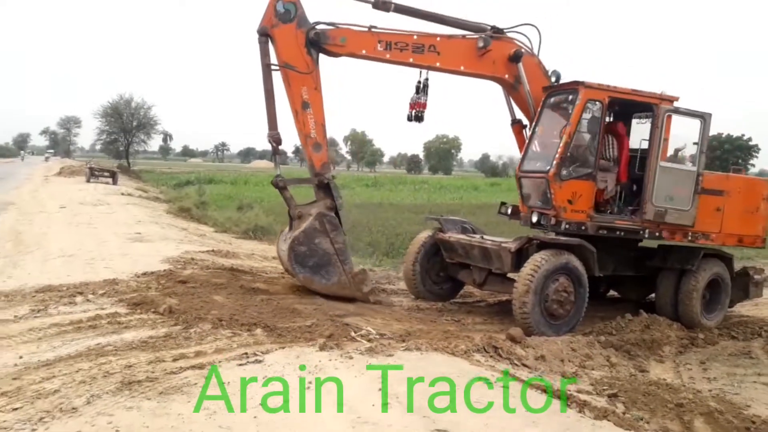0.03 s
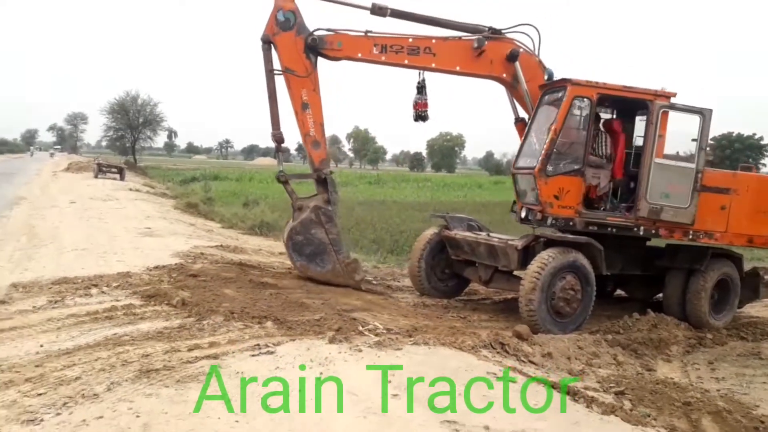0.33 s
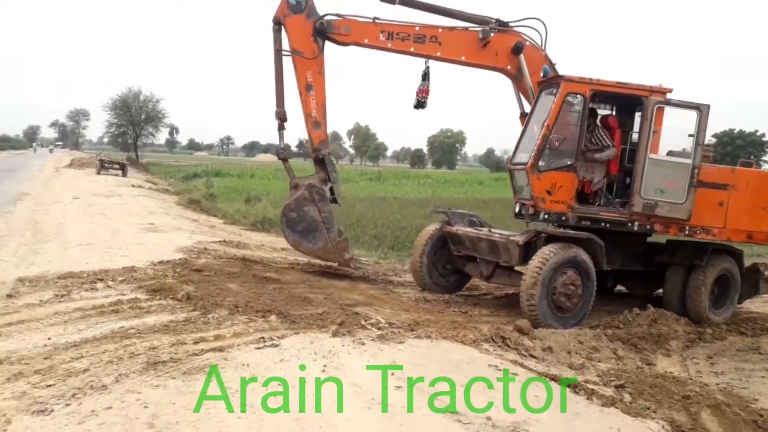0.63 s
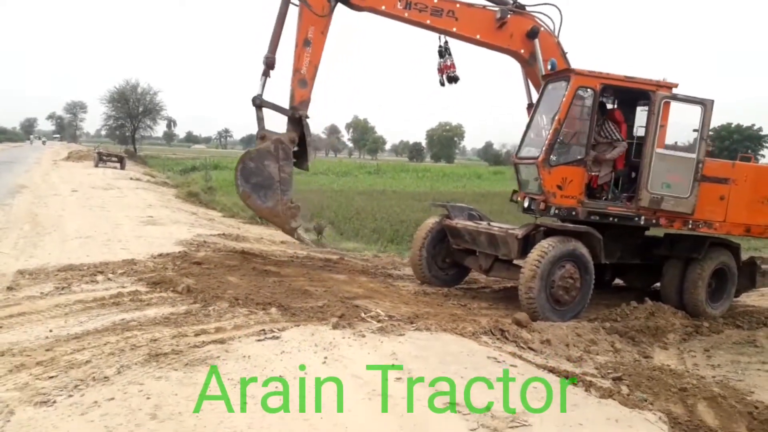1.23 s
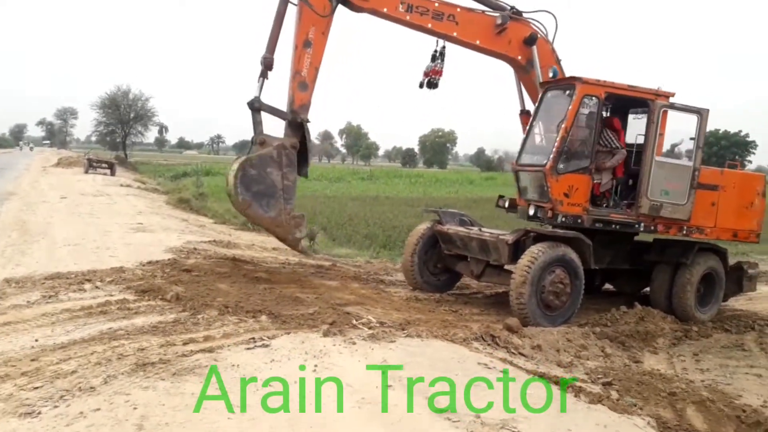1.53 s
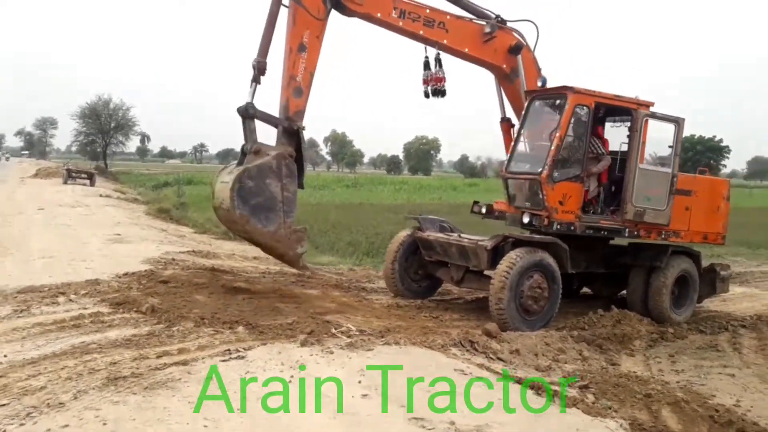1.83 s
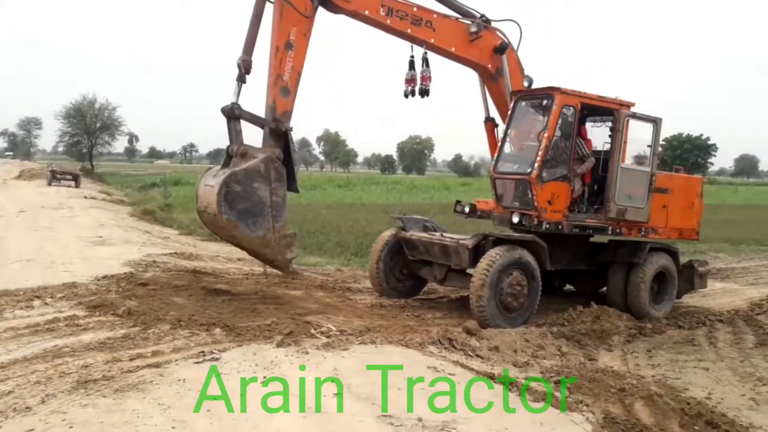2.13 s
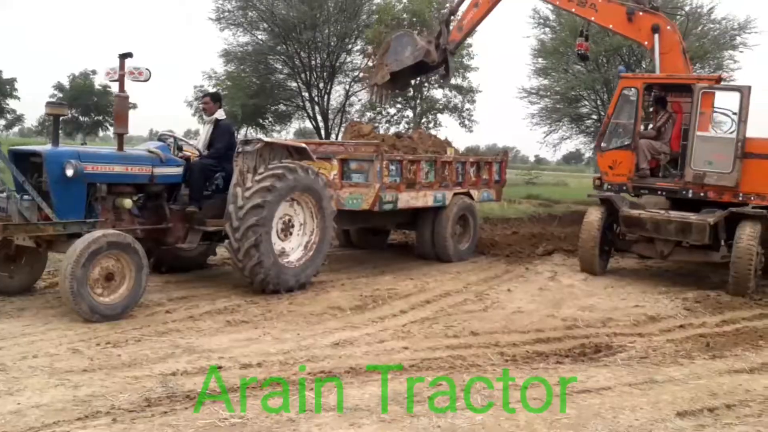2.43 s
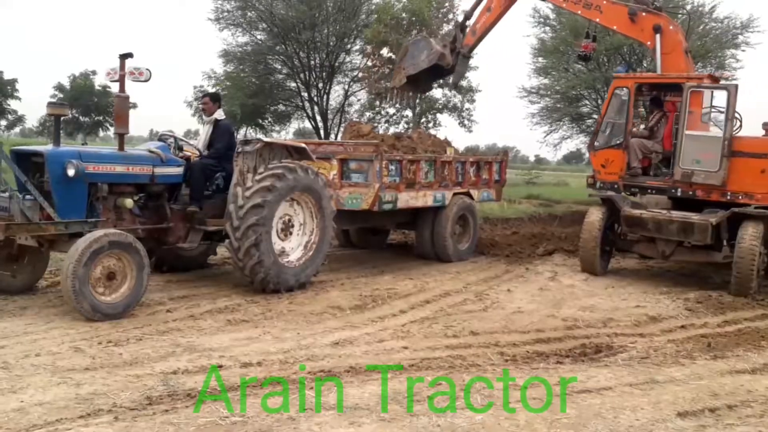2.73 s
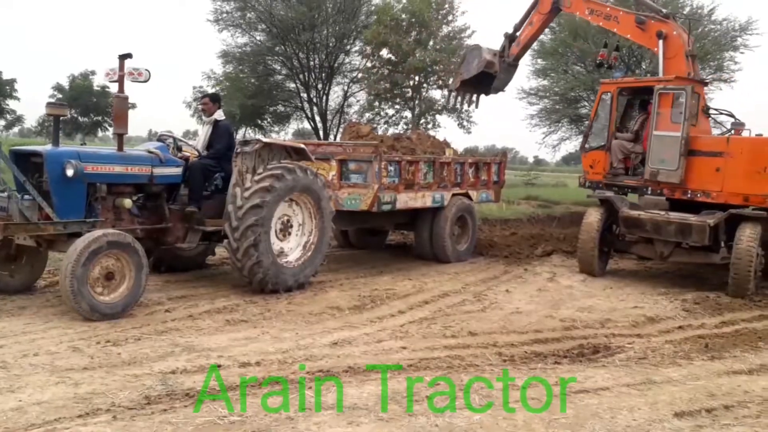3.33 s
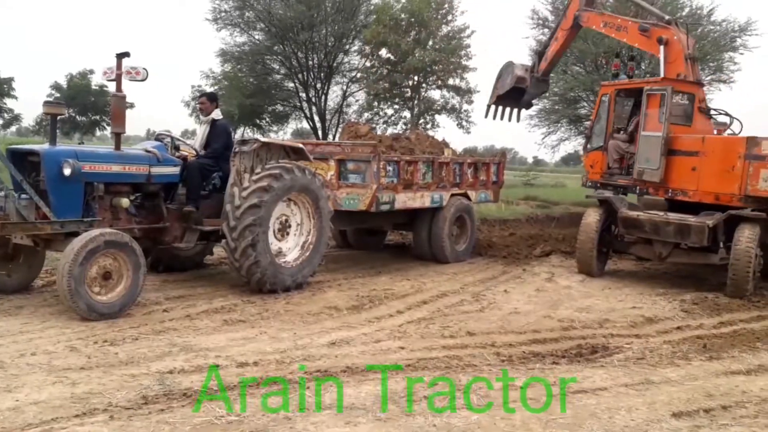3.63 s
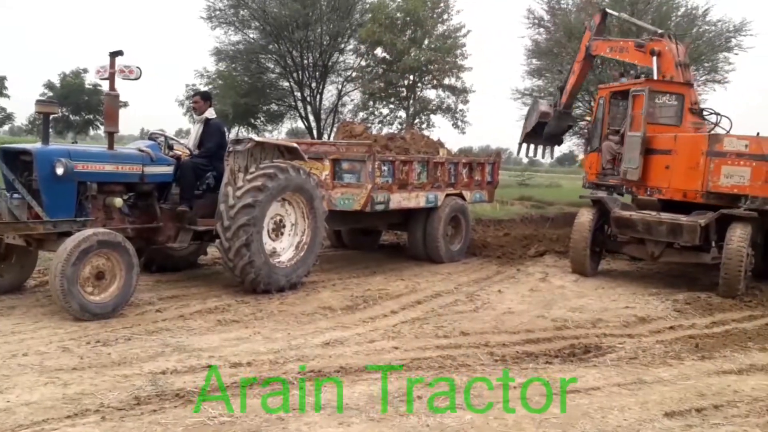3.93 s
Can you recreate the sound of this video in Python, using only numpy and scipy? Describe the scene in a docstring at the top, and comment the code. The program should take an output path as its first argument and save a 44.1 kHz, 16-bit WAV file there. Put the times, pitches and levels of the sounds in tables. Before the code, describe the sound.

A diesel excavator runs and clanks its bucket, then works farther off after a brief silence.

```python
"""On open ground, a wheeled diesel excavator scrapes up soil. Its steel bucket clanks and groans,
stones tick on it, and the engine slows under load and recovers while the hydraulics rasp and hiss.
After a short silence the machine works farther off, beside a tractor and trailer: one hears an engine
clatter, a pump hum and whine, and the arm clink. A small bird whistles now and then."""
import sys
import numpy as np
from scipy import signal
from scipy.fft import rfft, irfft
from scipy.io import wavfile
from scipy.ndimage import map_coordinates

SR = 44100
rng = np.random.default_rng(int(sys.argv[2]) if len(sys.argv) > 2 else 0)


def wrap_up_sound(samples):
    """Save the sound to the file named by the first command line argument, as 16-bit audio."""
    columns = np.atleast_2d(samples).T
    # keep every value between -1 and 1, then stretch to whole-number steps
    tamed = np.clip(columns, -1, 1)
    steps = np.round(tamed * 32767).astype(np.int16)
    wavfile.write(sys.argv[1], SR, steps)


N = 176400

SILENCE_START_S, SILENCE_END_S = 2.243, 2.578
CYLINDERS, TOP_HZ = 4, 15600
ATTACK_S = 0.00064  # how fast a hit builds up

# bird whistles (time [s], length [s], first pitch [Hz], last pitch [Hz], level [dB])
WHISTLES = [(0.16, 0.067, 6200, 5210, -39), (1.499, 0.092, 6830, 5550, -42),
            (1.546, 0.047, 5850, 3090, -41), (1.861, 0.12, 7670, 5590, -43), (2.16, 0.067, 5960, 4800, -39)]
# tiny bird chirps (time [s], level [dB])
CHIRPS = [(2.847, -34), (3.762, -33), (3.773, -30)]

# how fast the far engine fires (time [s], firing rate [Hz])
FAR_SPEED = [(2.7, 68.75), (3.12, 69.12), (3.42, 62.93), (4, 65.27)]
# how loud the far engine is (time [s], level [dB])
FAR_LEVEL = [(2.58, -45.5), (2.71, -27), (2.87, -24), (3.15, -23.5), (3.45, -25)]
# low and high parts of its clatter (frequency [Hz], relative level [dB])
FAR_BODY = [(53, -39), (90, -13), (123, -14), (161, -7), (329, -6.5), (480, -21.5), (655, -4), (838, -7.5),
            (1270, -21.5), (1520, -10), (2000, -29), (3600, -95)]
FAR_TREBLE = [(1700, -22), (2140, -1.5), (2630, -5.5), (3120, -1.5), (5260, -17), (6830, -18),
              (7960, -34.5), (15500, -30.5)]
# the oil pump (time [s], hum level [dB], whine level [dB])
PUMP_LEVELS = [(2.6, -56, -54.5), (2.85, -31, -32.5), (3.08, -51, -34), (3.22, -35, -43.5),
               (3.35, -30, -46), (3.83, -27, -38), (4, -37, -44)]
# tones in its whine (multiple of the pump's rate, relative level [dB])
WHINE_TONES = [(2, -2.5), (12, -4.5), (18, -10.5)]
# clinks of the far arm (time [s], level [dB], pitch [Hz])
CLINKS = [(2.925, -35, 3400), (3.353, -32.5, 4330), (3.725, -29.5, 3840), (3.787, -36.5, 4400),
          (3.807, -22.5, 1476)]

# how fast the near engine fires (time [s], firing rate [Hz])
NEAR_SPEED = [(.2, 120), (.75, 113.2), (1.28, 113.4), (1.5, 80.67), (1.8, 48.63), (1.98, 56.4), (2.1, 80.3),
              (2.24, 103.5)]
# its exhaust tones (multiple of the firing rate, level at top speed [dB])
EXHAUST_TONES = [(1, -38.5), (2, -39.5), (2.5, -38), (3.5, -40.5)]
# low and high parts of its clatter (frequency [Hz], relative level [dB])
NEAR_BODY = [(82, -40), (140, -19), (214, -11.5), (264, -3.5), (336, -11.5), (470, -5), (845, -24),
             (948, -19), (1310, -10.5), (2200, -27.5), (3600, -91.5)]
NEAR_TREBLE = [(1060, -38), (2160, -10), (2700, 3), (3320, -10.5), (3600, -4.5), (4720, -8.5), (5350, -5.5),
               (6300, -16.5), (11100, -18), (15500, -41.5)]
# whining rasp of the hydraulics (time [s], pitch [Hz], level [dB])
RASP = [(.1, 3400, -47), (.3, 3353, -35.5), (1.27, 3247, -41.5), (1.42, 2780, -30), (1.75, 2826, -70)]

# further hits on the bucket, heard only as dull thuds (time [s], level [dB])
KNOCKS = [(1.096, -22.5), (1.833, -24.5)]
# the bucket dragging through stony soil (time [s], level [dB])
SCRAPE_LEVEL = [(1.9, -52), (1.96, -28.5), (2.24, -37.5)]
# stones hitting steel (time [s], level [dB], pitch [Hz])
STONES = [(0.4187, -20, 9400), (0.4688, -23, 7800), (0.7555, -25.5, 9200), (0.773, -35, 10800),
          (1.9993, -28.5, 7000), (2.0278, -26, 6550)]
# steel rubbing (time [s], length [s], pitch [Hz], level [dB])
RUBS = [(0.762, .46, 263.8, -23), (3.73, .2, 3980, -41)]
# hits on the bucket (time [s], crash [dB], ring [dB], thud [dB], click [dB], pitch of the spot hit [Hz])
BUCKET_HITS = [(0.384, -19.5, -20.5, -22.5, -23.5, 3600), (0.569, -19.5, -34, -13.5, -30, 2600),
               (0.635, -22.5, -19, -31, -25, 3220), (0.692, -19.5, -10, -20, -32, 3400),
               (0.7206, -26, -15, -14.5, -27, 4100), (0.7424, -19, -10.5, -15, -38, 2400),
               (1.9404, -20, -11.5, -10, -23, 4760), (2.056, -20, -23.5, -28, -31.5, 1500),
               (2.128, -18.5, -22, -14, -30, 2590), (2.208, -25.5, -19.5, -21, -41, 1484)]
# the bucket's low ringing notes (pitch [Hz], level relative to the ring [dB], time to fade 60 dB [s])
BUCKET_NOTES = [(245.8, 2.5, 0.3), (397.5, -12, 0.7), (472.7, -8.5, 0.28), (642.5, -4, .12),
                (932, -17.5, 0.41)]
# high ringing notes of its plates (pitch [Hz])
PLATES_HZ = [1404, 2585, 2670, 3390, 3680, 4400, 5140, 9160, 10950]
# the low, middle and high noise of a hit (frequency [Hz], relative level [dB])
THUD = [(120, -32), (235, 4.5), (380, -5.5), (640, 8), (950, -17.5), (4000, -54.5)]
CRASH = [(400, -50), (950, -4.5), (1450, 4.5), (2000, -6), (2700, 0.5), (5200, -20), (14000, -47.5)]
CLICK = [(1200, -33.5), (4000, 7), (10500, -8), (16000, -26.5)]


def amp(db):
    """Turn decibels into a number to multiply by."""
    return 10 ** (np.asarray(db) / 20)


def unit(x):
    """Scale a sound to an average strength (rms) of 1."""
    return x / np.sqrt(np.mean(x ** 2) + 1e-20)


def clock():
    """The time of each sample, in seconds."""
    return np.arange(N) / SR


def curves(rows):
    """Join a table's points with straight lines: one curve for each column after the time."""
    times, *columns = np.transpose(rows)
    return [np.interp(clock(), times, column) for column in columns]


def wobble(rate):
    """A smooth curve through `rate` random points a second."""
    return map_coordinates(rng.standard_normal(int(N * rate / SR) + 4), [clock() * rate])


def coloured(x, colour):
    """Shape a sound's lows and highs by a (frequency, level) table, at strength 1."""
    points_hz, db = np.transpose(colour)
    hz = np.fft.rfftfreq(N, 1 / SR)
    gain = amp(np.interp(np.log(hz + 1), np.log(points_hz + 1), db))
    return unit(irfft(rfft(x) * gain, N))


def noise(colour):
    """Noise with shaped lows and highs."""
    return coloured(rng.standard_normal(N), colour)


def band(hz, q):
    """Noise around one pitch; a higher q sounds more like a note."""
    return unit(signal.lfilter(*signal.iirpeak(hz, q, fs=SR), rng.standard_normal(N)))


def strike(start, fade_s):
    """The loudness of a hit: a quick rise, then a fall of 60 dB in fade_s."""
    age = np.maximum(clock() - start, 0)
    return (1 - np.exp(-age / ATTACK_S)) * np.exp(-np.log(1000) * age / fade_s)


def tone(cycles, multiple, rough):
    """A tone that follows a running count of cycles; `rough` makes it waver."""
    level = np.sqrt(2) * (1 + rough * wobble(21.84))
    return level * np.sin(2 * np.pi * multiple * cycles + rough * wobble(35))


def count_firings(speed):
    """How many times a slightly unsteady engine has fired so far."""
    return np.cumsum(speed * (1 + .002 * wobble(30))) / SR


def clatter(firings, colour, repeat):
    """Firings shake the engine's metal; part of the shaking repeats every engine cycle."""
    flutter = amp(1.4 * wobble(400))
    pattern = rng.standard_normal(2048)
    repeating = pattern[(firings / CYLINDERS % 1 * len(pattern)).astype(int)]
    return coloured(flutter * (rng.standard_normal(N) + repeat * repeating), colour)


def bird(slide_s=0.034, chirp_hz=6950):
    """A small bird gives tiny chirps and whistles that slide down to a held note."""
    out = np.zeros(N)
    for start, length, first_hz, last_hz, db in WHISTLES:
        age = np.arange(int(length * SR)) / SR
        hz = np.interp(age, [0, slide_s], [first_hz, last_hz])
        phase = 2 * np.pi * np.cumsum(hz) / SR + .5 * wobble(680)[:len(age)]
        swell = signal.windows.tukey(len(age), .5)
        out[int(start * SR):][:len(age)] += np.sqrt(2) * amp(db) * swell * np.sin(phase)
    age = np.arange(int(0.0035 * SR)) / SR
    chirp = np.hanning(len(age)) * np.sin(2 * np.pi * chirp_hz * age)
    for start, db in CHIRPS:
        out[int(start * SR):][:len(age)] += amp(db) * chirp
    return out


def pump(firings):
    """The oil pump hums and whines, its pitch following the engine's speed."""
    hum_db, whine_db = curves(PUMP_LEVELS)
    cycles = 2.5 * firings
    whine = sum(amp(db) * tone(cycles, multiple, rough=.1) for multiple, db in WHINE_TONES)
    return amp(hum_db) * tone(cycles, 0.98, rough=0.16) + amp(whine_db) * whine


def far_engine():
    """Farther off, the engine clatters, drones through its exhaust and drives the pump."""
    speed, = curves(FAR_SPEED)
    level_db, = curves(FAR_LEVEL)
    firings = count_firings(speed)
    body = clatter(firings, FAR_BODY, repeat=0.94)
    treble = amp(-12.5) * clatter(firings, FAR_TREBLE, repeat=1.0)
    exhaust = amp(-12.5) * tone(firings, 0.99, rough=0.17)
    return amp(level_db) * (body + treble + exhaust) + pump(firings)


def far_clinks():
    """Steel parts of the far arm touch lightly, each with a short ping."""
    return sum(amp(db) * strike(start, fade_s=0.12) * band(hz, q=19) for start, db, hz in CLINKS)


def hydraulics(octaves, hiss_hz=9800):
    """Oil hisses through the valves, with a rasp that gets rougher as the engine slows."""
    hz, db = curves(RASP)
    phase = 2 * np.pi * np.cumsum(hz) / SR + (.5 - 3 * octaves) * wobble(300)
    rasp = np.sin(phase) * (1 + 0.41 * wobble(120))
    hiss = amp(-16) * noise([(hiss_hz / 2, -30), (hiss_hz, 0), (TOP_HZ, -30)])
    return amp(db) * (rasp + hiss)


def near_engine():
    """The engine drives the hydraulics; its exhaust and clatter get quieter as it slows under load."""
    speed, = curves(NEAR_SPEED)
    firings = count_firings(speed)
    octaves = np.log2(speed / np.max(speed))  # 0 at top speed, -1 at half speed
    exhaust = sum(amp(db) * tone(firings, multiple, rough=.04 if multiple == 1 else .4)
                  for multiple, db in EXHAUST_TONES)
    body = amp(-24.5 + 11 * octaves) * clatter(firings, NEAR_BODY, repeat=0.59)
    treble = amp(-34 + 8.5 * octaves) * clatter(firings, NEAR_TREBLE, repeat=0.11)
    return amp(21 * octaves) * exhaust + body + treble + hydraulics(octaves)


def dull_bucket_hits():
    """A few more hits on the bucket sound only as dull thuds."""
    return noise(THUD) * sum(amp(db) * strike(start, fade_s=0.11) for start, db in KNOCKS)


def soil_scrape():
    """Grit scrapes unevenly along the bucket's plates."""
    level_db, = curves(SCRAPE_LEVEL)
    return amp(level_db) * unit(noise(CRASH) * amp(6.2 * wobble(130)))


def stone_ticks():
    """Stones hit the steel with short, bright ticks, each at its own pitch."""
    return sum(amp(db) * strike(start, fade_s=0.033) * band(hz, q=4.6) for start, db, hz in STONES)


def rubbing_steel(steady_cycles=13):
    """Rubbed steel sings on an unsteady pitch: first a low groan, later a thin squeal."""
    out = np.zeros(N)
    for start, length, hz, db in RUBS:
        note = np.sin(2 * np.pi * hz * clock() + wobble(hz / steady_cycles))
        swell = signal.windows.tukey(int(length * SR), .5)
        out[int(start * SR):][:len(swell)] += amp(db) * swell * note[:len(swell)]
    return out


def bucket_clanks(plate_fade_s=0.12, rise_cycles=1.3):
    """Each hit makes the bucket and its plates ring, with a thud, a crash and a bright click."""
    age = np.arange(SR // 2) / SR
    ring, thud_power, crash_power, click_power = np.zeros((4, N))
    for start, crash_db, ring_db, thud_db, click_db, spot_hz in BUCKET_HITS:
        low = [(hz, ring_db + db, fade_s) for hz, db, fade_s in BUCKET_NOTES]
        # plate notes lose 12 dB for each octave away from the pitch of the spot hit
        high = [(hz, crash_db - 3.5 - 12 * abs(np.log2(hz / spot_hz)), plate_fade_s) for hz in PLATES_HZ]
        for hz, db, fade_s in low + high:
            level = amp(db + rng.normal(0, 1.5))
            note = np.sin(2 * np.pi * hz * age + rng.uniform(0, 2 * np.pi))
            rise = (1 - np.exp(-age * hz / rise_cycles)) ** 2
            fade = np.exp(-np.log(1000) * age / fade_s)
            ring[int(start * SR):][:len(age)] += level * rise * fade * note
        thud_power += (amp(thud_db) * strike(start, fade_s=0.16)) ** 2
        contact = strike(start, fade_s=0.17)
        crash_power += (amp(crash_db) * contact) ** 2
        click_power += (amp(click_db) * contact) ** 2
    thud = np.sqrt(thud_power) * noise(THUD)
    crash = np.sqrt(crash_power) * noise(CRASH)
    click = np.sqrt(click_power) * noise(CLICK)
    return ring + thud + crash + click


def scene():
    """Digging close by, a short silence, then work farther off."""
    t = clock()
    near = near_engine() + bucket_clanks() + soil_scrape() + dull_bucket_hits()
    far = far_engine() + far_clinks()
    machine = np.where(t < SILENCE_START_S, near, far)
    mix = machine + stone_ticks() + rubbing_steel() + bird()
    audible = (t < SILENCE_START_S) | (t > SILENCE_END_S)
    return (mix * audible)[None]


def record(dry):
    """Cut away the very highest sounds, above TOP_HZ."""
    return signal.sosfilt(signal.ellip(16, .1, 100, TOP_HZ, fs=SR, output="sos"), dry)


dry = scene()
out = record(dry)
wrap_up_sound(out)
```